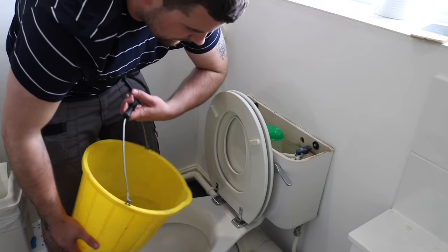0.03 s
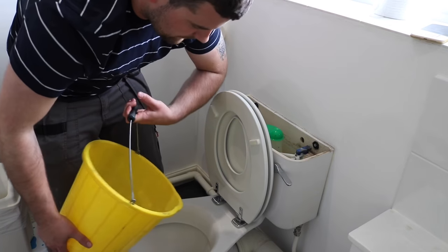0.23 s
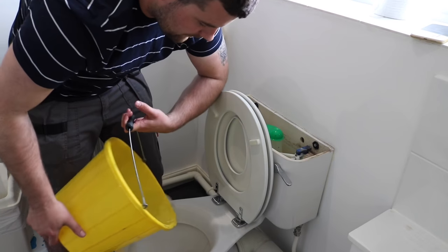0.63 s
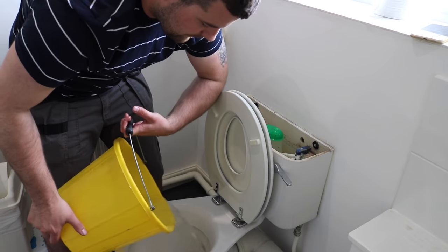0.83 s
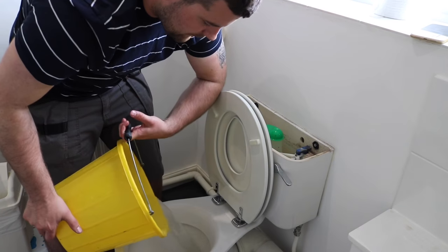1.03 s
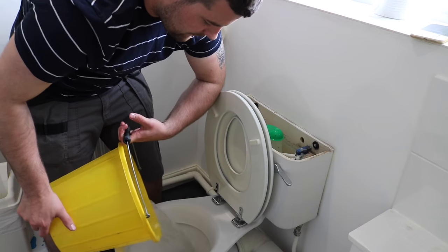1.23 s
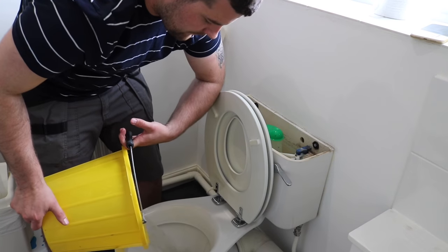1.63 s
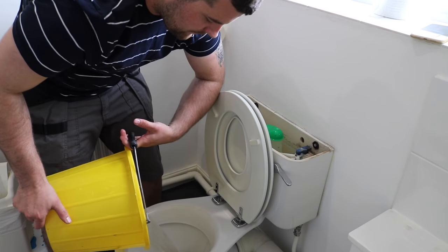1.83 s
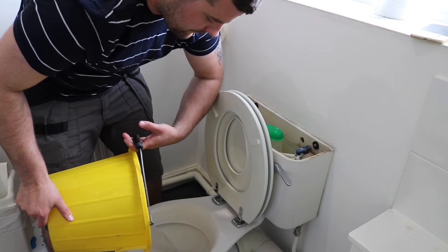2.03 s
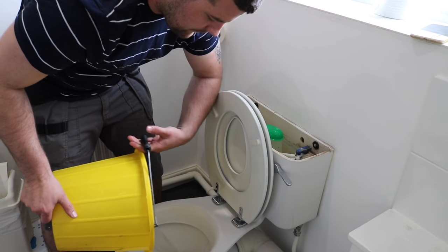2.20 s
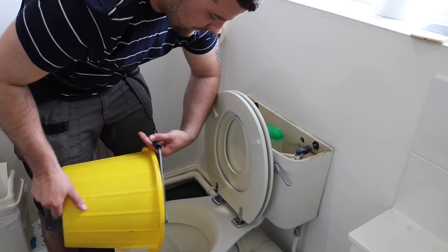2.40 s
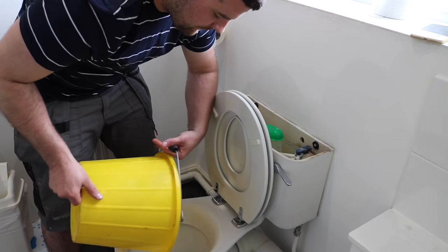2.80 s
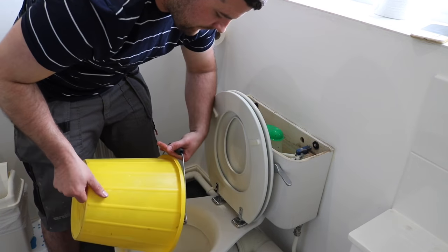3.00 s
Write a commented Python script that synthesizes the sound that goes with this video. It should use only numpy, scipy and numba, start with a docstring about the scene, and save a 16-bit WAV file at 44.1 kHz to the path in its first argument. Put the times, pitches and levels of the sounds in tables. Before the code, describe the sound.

Water is poured from a plastic bucket into a toilet in a small, hard-walled bathroom. The full bucket knocks hollowly at about 0.2 seconds, and its handle squeaks very faintly around 0.5. From 0.9 seconds the water rushes into the bowl with bright splashes, bubbles, plops and deep gurgles, while the drain rumbles low from about 1.4. The flow thins to a last small splash at 3 seconds.

```python
"""A plastic bucket of water gives one hollow knock in a small hard-walled bathroom. Its handle squeaks
faintly as it tips, then the stream slaps the china of a toilet bowl as spray and drives air into the
pool: clouds of bubbles, deep gurgles and single plops ring the bowl while the trap rumbles.
The flow thins to a last splash."""
import sys
import numpy as np
from scipy import signal
from scipy.fft import rfft, irfft, next_fast_len
from scipy.io import wavfile
from scipy.ndimage import uniform_filter1d
from numba import njit

SR = 44100
rng = np.random.default_rng(int(sys.argv[2]) if len(sys.argv) > 2 else 0)


def wav_out(sig):
    """Save sig, one row per channel (or a flat mono array), as 16-bit PCM at SR to the path in sys.argv[1]."""
    wavfile.write(sys.argv[1], SR, np.round(np.clip(np.atleast_2d(sig).T, -1, 1) * 32767).astype(np.int16))


N = 138915


def undb(db):
    return 10 ** (np.asarray(db) / 20)


def unit(x):
    """Scale to rms 1."""
    return x / np.sqrt(np.mean(x ** 2) + 1e-18)


def at(points, hz):
    """Read a table over log frequency."""
    freqs, values = np.array(points).T
    return np.interp(np.log(hz + 1), np.log(freqs), values)


def swell(points):
    """A fader ride through (s, dB) points, silent before the first."""
    s, db = np.array(points).T
    return undb(np.interp(np.arange(N) / SR, s, db, left=-120))


def since(start):
    """Seconds since a moment, zero before it."""
    return np.maximum(np.arange(N) / SR - start, 0)


def arch(start, length_s):
    """A half-sine fade in and out."""
    return np.sin(np.pi * np.minimum(since(start) / length_s, 1))


def die_away(t, t60):
    """A decay that loses 60 dB in t60 seconds."""
    return np.exp(-np.log(1000) * t / t60)


def shape(x, response):
    """Filter by a function of frequency."""
    size = next_fast_len(len(x) + SR // 2, True)
    return irfft(rfft(x, size) * response(np.fft.rfftfreq(size, 1 / SR)), size)[:len(x)]


def peak(f, hz, width):
    """Response of one resonance, 1 at its centre."""
    return 1j * f * width / (hz ** 2 - f ** 2 + 1j * f * width)


def noise(response):
    """Coloured noise of rms 1."""
    return unit(shape(rng.standard_normal(N), response))


def drift(rate_hz):
    """Random motion of rms 1, mostly slower than rate_hz."""
    return noise(lambda f: 1 / (1 + (f / rate_hz) ** 4))


def spread(mid, side):
    """Left and right: alike in the bass, unrelated in the treble."""
    # Stereo width of the room. Each row: frequency in Hz, side gain in dB.
    width = [(100, -5), (300, -11), (700, -6.5), (1500, -1), (3000, 0), (12000, 0)]
    return mid + shape(side, lambda f: undb(at(width, f))) * np.array([[1], [-1]])


def reflections(x):
    """Dense wall reflections that die sooner in the treble."""
    # The bathroom's reverb. Each row: frequency in Hz, time to fall 60 dB in seconds.
    reverb_times = [(100, 1), (500, 0.38), (2000, 0.17), (6000, 0.17), (15000, 0.058)]
    t = since(0.0014)[:SR // 2]  # a tiny pre-delay
    f = np.fft.rfftfreq(SR // 2, 1 / SR)
    white = rfft(rng.standard_normal((2, len(t))))
    tail = 0
    for band_hz, t60 in reverb_times:
        band = at([(hz, hz == band_hz) for hz, _ in reverb_times], f)
        fade = (t > 0) * die_away(t, t60)
        tail = tail + irfft(white * band) * fade / np.linalg.norm(fade)
    return signal.fftconvolve(x[None], spread(*tail), axes=1)[:, :N]


def room(x, wet_db):
    """Direct sound plus reflections from one spot."""
    return (x + undb(wet_db) * reflections(x)) / np.hypot(1, undb(wet_db))


def wandering(x, spots, wet_db):
    """The stream lands now here, now there; each spot has its own reflections, so the colour shifts."""
    shares = np.array([drift(rate_hz=14) for _ in range(spots)])
    shares = shares / np.sqrt(np.sum(shares ** 2, axis=0))
    wet = sum(reflections(x * share) for share in shares)
    return (x + undb(wet_db) * wet) / np.hypot(1, undb(wet_db))


def air():
    """Faint steady room tone of the house."""
    # Colour of the still air. Each row: frequency in Hz, relative level in dB.
    colour = [(18, -46), (30, -16.5), (384, -16.5), (485, -14), (1030, -21), (1560, -24.5), (1780, -27.5),
              (2190, -26.5), (2770, -31), (3070, -29.5), (15000, -39.5)]
    mid, side = (noise(lambda f: undb(at(colour, f))) for _ in range(2))
    return undb(-54) * spread(mid, side)


def handle():
    """The handle squeaks and rubs softly as the bucket tips."""
    # Each row is one rub: start and length in seconds, centre and width in Hz, level in dB.
    rubs = [(0.372, 0.051, 2440, 120, -57.5), (0.584, 0.037, 3000, 3000, -57.5),
            (0.614, 0.044, 7400, 1990, -58.5)]
    return sum(undb(db) * arch(start, length_s) * noise(lambda f: peak(f, hz, width) ** 2)
               for start, length_s, hz, width, db in rubs)


def trap():
    """Water shoved through the bend booms low."""
    # Surges in the trap. Each row: time in seconds, relative level in dB.
    surges = [(0.95, -83), (0.99, -55), (1.42, -37.5), (1.48, -52.5), (1.94, -41), (2.06, -34.5),
              (2.22, -48), (2.25, -37.5), (2.81, -44.5), (2.93, -39), (3.13, -64), (3.15, -81)]
    return undb(-3.5) * swell(surges) * noise(lambda f: peak(f, hz=96.7, width=34.5) ** 2)


def knock():
    """One blow on the full bucket: a crack, a hollow ring and a dull boom; then the water thumps back."""
    # Low tones that ring after the blow. Each row: pitch in Hz, relative level in dB, 60 dB decay in seconds.
    modes = [(123.4, -20.5, 0.624), (221.6, -1.5, 0.46), (304, -9.5, 0.57), (349, -10.5, 0.55),
             (381, -7, 0.21), (615, -29, 0.2), (689, -11.5, 0.21), (830, -19, .27), (915, -18, 0.25),
             (1314, -24, 0.23)]
    # Crack of the plastic. Each row: frequency in Hz, relative level in dB.
    crack_colour = [(40, -17), (120, 8), (300, -13.5), (600, -20.5), (900, -3), (1400, -16), (2000, -17.5),
                    (2800, -26.5), (4000, -31.5), (5500, -42), (9000, -52), (15000, -62)]
    # Boom of the water and the room. Each row: frequency in Hz, relative level in dB.
    boom_colour = [(25, -33), (60, -29), (85, -25), (125, -36), (165, -18), (210, -7.5), (300, -5.5),
                   (400, -7), (520, -22), (900, -31.5), (1500, -37.5), (3000, -52), (6000, -94)]
    t = since(0.2195)
    ring_rise_s, boom_rise_s, crack_rise_s, crack_decay_s = 0.0029, 0.0066, 0.0015, 0.0071
    ring = sum(undb(db) * die_away(t, t60) * np.sin(2 * np.pi * hz * t) for hz, db, t60 in modes)
    ring *= 1 - np.exp(-t / ring_rise_s)
    crack = noise(lambda f: undb(at(crack_colour, f)))
    crack *= np.minimum(t / crack_rise_s, 1) * np.exp(-t / crack_decay_s)
    crack = signal.sosfilt(signal.butter(3, 190, "high", fs=SR, output="sos"), crack)
    mid, side = (noise(lambda f: undb(at(boom_colour, f))) for _ in range(2))
    boom = spread(mid, undb(3) * side) * die_away(t, t60=0.43) * (1 - np.exp(-t / boom_rise_s))
    strongest_hz = modes[1][0]
    rebound = arch(0.272, length_s=0.04) * np.sin(2 * np.pi * strongest_hz * t)
    return (undb(-3) * ring + undb(-6.5) * boom + room(undb(-2.5) * crack, wet_db=-2.5)
            + undb(-12) * rebound)


def droplets(scatter_db):
    """A dense patter of drops; a few hit much harder than the rest."""
    return rng.standard_normal(N) * undb(scatter_db * np.minimum(rng.exponential(size=N), 4))


def slaps():
    """Short bright bursts of drops where a sheet of water hits the china."""
    # Each row is one slap: start in seconds, centre in Hz, level in dB, decay in seconds.
    hits = [(.902, 9350, -43, .014), (0.922, 1900, -35, .012), (0.923, 3700, -20.5, .009),
            (0.925, 9800, -23, .011), (0.945, 3250, -17.5, .009), (1.174, 3420, -21.5, .015),
            (1.284, 4400, -16.5, .012), (1.644, 4900, -15.5, .015), (2.006, 7600, -20.5, .019),
            (2.211, 3700, -21, .017), (2.254, 8700, -27, .022), (2.335, 12200, -35, .016),
            (2.576, 2900, -19.5, .018), (2.614, 4600, -19.5, .015), (2.765, 2920, -24, .022),
            (2.853, 3740, -20, .014), (2.923, 9500, -28.5, .014), (3.012, 4200, -28, .016),
            (3.014, 8500, -34, .018), (3.022, 1650, -30, .018)]
    rise_s, relative_width, top_hz = 0.002, 0.55, 10500
    out = np.zeros(N)
    for start, hz, db, decay_s in hits:
        t = since(start)
        burst = shape(droplets(scatter_db=3.5),
                      lambda f: peak(f, hz, relative_width * hz) ** 2 / (1 + (f / top_hz) ** 6))
        out += undb(db) * (1 - np.exp(-t / rise_s)) * np.exp(-t / decay_s) * unit(burst)
    return out


def bubble(hz, cycles, rise):
    """A decaying sine that starts within a cycle; its pitch rises as the bubble nears the surface."""
    age = np.arange(int(6 * cycles * SR / hz) + 2) * hz / SR  # in cycles of the starting pitch
    envelope = np.minimum(age, 1) * np.exp(-age / cycles)
    return envelope * np.sin(2 * np.pi * age * (1 + rise * age / cycles / 2))


def plops():
    """Large pockets of air ring one by one, faint in the bucket, then loud in the bowl."""
    # Each row is one pocket: start in seconds, pitch in Hz, level in dB, decay in seconds.
    pockets = [(0.084, 488, -45, .012), (.162, 517, -45, 0.0092), (0.724, 490, -40.5, 0.014),
               (.805, 525, -48, 0.013), (0.884, 488, -44, 0.0089), (0.945, 1646, -14, 0.0074),
               (.947, 1876, -15, 0.0083), (0.975, 915, -10.5, 0.017), (.9745, 745, -12, 0.0099),
               (.992, 907, -7, 0.012), (1.046, 689, -12.5, 0.037), (1.055, 1946, -18, 0.013),
               (1.058, 922, -14, 0.035), (1.062, 1640, -17, 0.0066), (1.083, 990, -14.5, 0.0069),
               (1.087, 1190, -18.5, 0.014), (1.096, 233, -23, 0.032), (1.162, 923, -20, 0.032),
               (1.199, 247, -23.5, .02), (1.203, 732, -15, 0.022), (1.25, 228.4, -20, 0.053),
               (1.285, 710, -15, 0.0062), (1.288, 262, -22.5, .014), (1.325, 235, -21.5, 0.017),
               (1.474, 1650, -12.5, 0.0083), (1.49, 740, -21, 0.017), (1.547, 1426, -17.5, 0.011),
               (1.6, 794, -26, 0.014), (1.665, 1910, -15, 0.0069), (1.668, 702, -18, 0.02),
               (1.715, 689, -16, 0.013), (1.85, 772, -11.5, 0.0056), (1.908, 385, -17, 0.017),
               (1.91, 670, -22, 0.022), (1.928, 317, -20, .015), (1.948, 667, -15.5, 0.011),
               (1.952, 767, -21, .016), (1.975, 600, -20.5, .016), (2.002, 1880, -14, 0.0065),
               (2.075, 266, -36, .025), (2.124, 337, -23, 0.02), (2.211, 1460, -17.5, 0.01),
               (2.232, 235, -27, 0.023), (2.238, 704, -18.5, 0.026), (2.262, 498, -18.5, 0.0081),
               (2.288, 711, -19, 0.021), (2.335, 236, -21, 0.048), (2.345, 924, -18.5, 0.033),
               (2.372, 1317, -14.5, 0.012), (2.399, 221, -22, 0.029), (2.412, 367, -24, .01),
               (2.502, 1675, -14.5, 0.009), (2.535, 1714, -23.5, 0.021), (2.575, 1870, -20, 0.013),
               (2.611, 2160, -23.5, 0.02), (2.635, 228, -26.5, 0.032), (2.854, 2170, -18.5, 0.0052),
               (2.888, 1031, -23.5, 0.031), (2.951, 1100, -24, 0.0075), (3.014, 3945, -29, 0.0163),
               (3.026, 1593, -26, 0.023)]
    out = np.zeros(N)
    for start_s, hz, db, decay_s in pockets:
        start = int(start_s * SR)
        ring = bubble(hz, cycles=hz * decay_s, rise=0.016)[:N - start]
        out[start:start + len(ring)] += undb(db) * ring
    return out


def cloud(per_s, lo_hz, hi_hz, cycles, rise, scatter_db):
    """Bubbles of random size at random moments; a few are much louder than the rest."""
    out = np.zeros(N)
    draws = np.random.default_rng(rng.integers(2 ** 31)).random((int(per_s * N / SR), 4))
    for when, pitch, strength, life in draws:
        hz = lo_hz * (hi_hz / lo_hz) ** pitch
        start = int(when * N)
        ring = bubble(hz, cycles * (.5 + life), rise)[:N - start]
        accent_db = -scatter_db * np.log(1 - .98 * strength)
        out[start:start + len(ring)] += ring * hz * undb(accent_db)
    return out


def bowl(x):
    """The colour of splashing inside the china bowl, at rms 1."""
    # Broad tone of the splashing. Each row: frequency in Hz, relative gain in dB.
    tone = [(150, -22), (220, -12.5), (380, -6), (540, -6.5), (700, -7), (1030, -7), (1650, -7.5),
            (4070, -11), (6000, -11.5), (9650, -16.5), (13800, -25), (15500, -51)]
    # Resonances of the bowl and the air around it. Each row: centre and width in Hz, strength in dB.
    modes = [(228, 30, 5), (345, 50, -3), (695, 45, 4.5), (750, 50, 2), (922, 26, 4), (1175, 70, -5),
             (1486, 45, -3), (1635, 50, -2), (1880, 120, -8)]

    def response(f):
        ringing = sum(undb(db) * peak(f, hz, width) for hz, width, db in modes)
        return undb(at(tone, f)) * (1 + ringing)
    return unit(shape(x, response))


def flutter(rate_hz, depth_db):
    """Uneven flow: a gain that wanders at random."""
    return undb(depth_db * drift(rate_hz))


def spatter(x, rate_hz, depth_db):
    """Each band of the splashing flickers by itself, so its colour keeps shifting."""
    # The flickering bands. Each entry is a centre in Hz.
    centres = [1100, 1600, 2400, 3700, 6000, 8500, 12000]
    bands = [shape(x, lambda f: at([(hz, hz == own) for hz in centres], f)) for own in centres]
    return unit(sum(band * flutter(rate_hz, depth_db) for band in bands))


def stream():
    """The pour: drop impacts and fizz on top, ringing bubbles in the pool, gurgles below."""
    # Fader rides for the spray with its fizz, the small and large bubbles and the deep gurgle.
    # Each row: time in seconds, relative level in dB.
    spray_ride = [(0.915, -56), (0.95, -34), (1.02, -31), (1.12, -28.5), (1.28, -29.5), (1.39, -35),
                  (1.42, -29), (1.5, -29), (1.62, -32), (1.7, -30.5), (1.96, -34), (2.04, -31), (2.1, -35),
                  (2.18, -36), (2.23, -32.5), (2.7, -33), (2.92, -32.5), (2.97, -46), (3.0, -46),
                  (3.03, -38), (3.1, -55), (3.15, -54)]
    small_ride = [(0.95, -24), (1.02, -27), (1.07, -22), (1.15, -28.5), (1.18, -25), (1.37, -27),
                  (1.47, -22), (1.94, -27), (2.04, -24.5), (2.18, -32.5), (2.21, -25), (2.6, -27),
                  (2.69, -31), (2.74, -25), (2.89, -31), (3.0, -41.5), (3.02, -48), (3.15, -54)]
    large_ride = [(0.97, -33), (1.03, -30), (1.08, -22.5), (1.14, -30), (1.21, -24), (1.28, -23),
                  (1.38, -32), (1.5, -24), (1.56, -28), (1.63, -29), (1.7, -25), (1.89, -27), (1.97, -22.5),
                  (2.06, -25), (2.19, -31), (2.24, -26), (2.42, -26.5), (2.5, -31), (2.66, -28),
                  (2.82, -29), (2.95, -30), (2.99, -40), (3.15, -48)]
    gurgle_ride = [(0.95, -52), (0.99, -42), (1.03, -48), (1.1, -38), (1.18, -36), (1.28, -28.5),
                   (1.42, -32), (1.55, -38), (1.88, -37.5), (1.92, -31), (2.08, -28.5), (2.2, -38),
                   (2.25, -30), (2.33, -34), (2.41, -32), (2.48, -38), (2.65, -37), (2.92, -41),
                   (3.08, -61), (3.15, -63)]
    bright_drops = shape(droplets(scatter_db=9), lambda f: f ** 4 / (f ** 4 + 3500 ** 4))
    spray = spatter(bowl(bright_drops), rate_hz=14, depth_db=1.44)
    fizz = bowl(cloud(per_s=710, lo_hz=3800, hi_hz=10100, cycles=6.4, rise=0.09, scatter_db=1.0))
    small = bowl(cloud(per_s=2800, lo_hz=1102, hi_hz=4200, cycles=4.64, rise=0.064, scatter_db=3.0))
    small = spatter(small, rate_hz=22, depth_db=1.46)
    large = bowl(cloud(per_s=900, lo_hz=540, hi_hz=1290, cycles=3.34, rise=0.055, scatter_db=2.5))
    gurgle = bowl(cloud(per_s=500, lo_hz=190.2, hi_hz=559, cycles=3.1, rise=0.05, scatter_db=2.2))
    top = (undb(0.5) * spray + undb(-7.5) * fizz) * flutter(rate_hz=80, depth_db=1.0)
    return (top * swell(spray_ride) + small * swell(small_ride)
            + undb(-2) * large * swell(large_ride) + gurgle * swell(gurgle_ride))


def scene():
    """The knock and the pour in the bathroom, over the trap's rumble and the room tone."""
    return (knock() + wandering(stream() + handle(), spots=6, wet_db=6.5)
            + room(slaps(), wet_db=0) + room(plops(), wet_db=-6) + trap() + air())


@njit
def follow(x, release):
    """Peak follower: rises at once, falls slowly."""
    out, held = np.empty(len(x)), 0.
    for i in range(len(x)):
        held = max(x[i], held * release)
        out[i] = held
    return out


def record(dry):
    """A limiter holds the loudest peaks; the deepest bass and the top are cut."""
    low_cut_hz, top_hz = 14, 15200
    limit_db, release_s = -3, 0.2
    dry = signal.sosfilt(signal.butter(2, low_cut_hz, "high", fs=SR, output="sos"), dry)
    peaks = follow(np.abs(dry).max(axis=0), np.exp(-1 / (release_s * SR)))
    gain = uniform_filter1d(np.minimum(1, undb(limit_db) / (peaks + 1e-9)), size=64)
    return signal.sosfilt(signal.ellip(8, .2, 70, top_hz, fs=SR, output="sos"), dry * gain)


dry = scene()
out = record(dry)
wav_out(out)
```